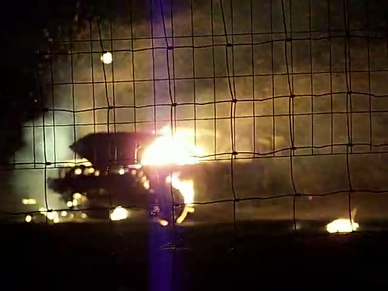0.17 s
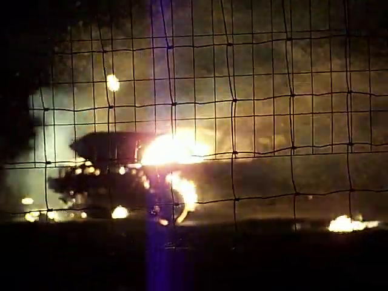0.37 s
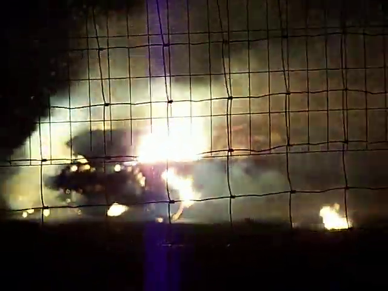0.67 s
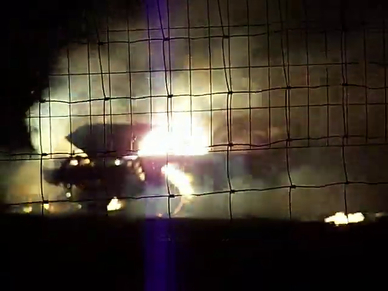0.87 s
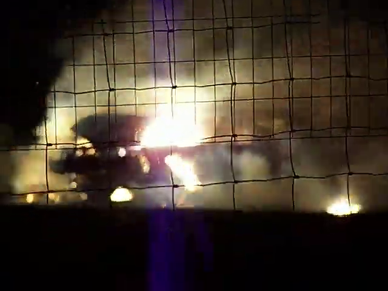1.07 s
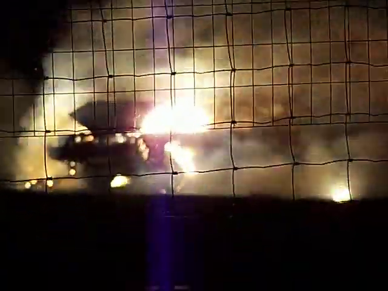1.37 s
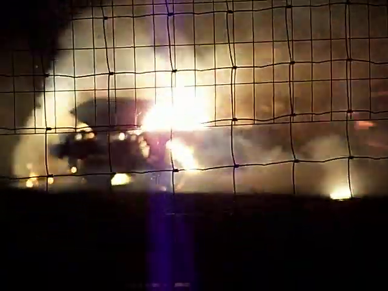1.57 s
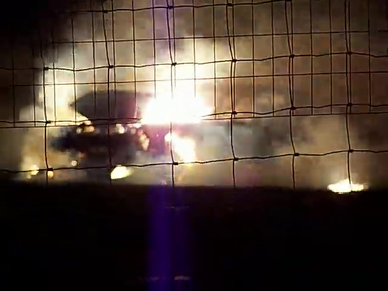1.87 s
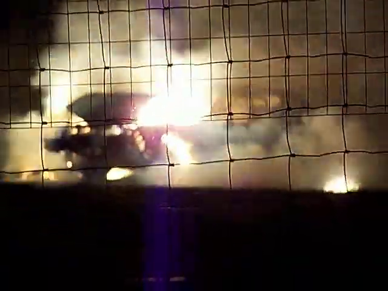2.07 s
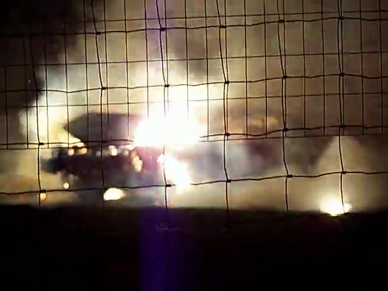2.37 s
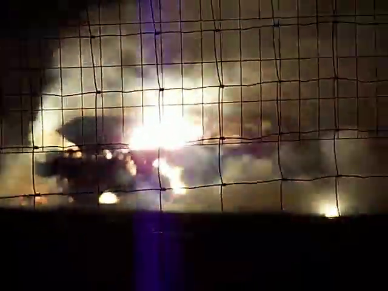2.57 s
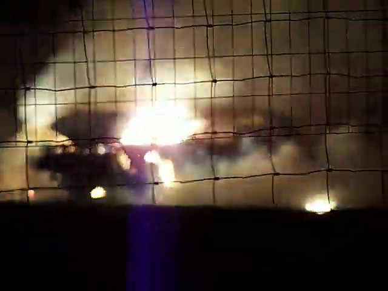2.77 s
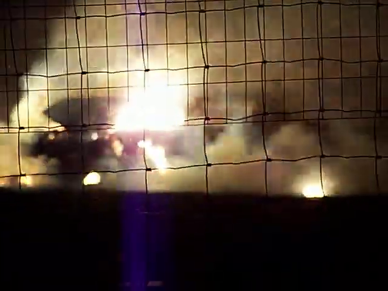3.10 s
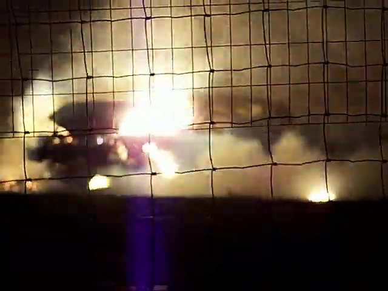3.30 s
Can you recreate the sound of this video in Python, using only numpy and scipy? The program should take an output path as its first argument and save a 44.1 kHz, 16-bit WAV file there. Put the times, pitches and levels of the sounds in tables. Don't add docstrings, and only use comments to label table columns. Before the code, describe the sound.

A jet engine runs continuously at high power on open ground at night, rumbling and roaring, while a very high whine grows stronger and flutters; heard some tens of metres away through a small camera microphone.

```python
import sys
import numpy as np
from scipy import signal
from scipy.fft import rfft, irfft
from scipy.io import wavfile
from scipy.ndimage import uniform_filter1d

SR = 44100
rng = np.random.default_rng(int(sys.argv[2]) if len(sys.argv) > 2 else 0)


def output_pcm(signal):
    pcm = np.clip(np.atleast_2d(signal).T, -1, 1) * 32767
    wavfile.write(sys.argv[1], SR, np.round(pcm).astype(np.int16))


def nominal_scale(level):
    x = np.asarray(level, float) / 20
    return 10 ** x


N = 151704
BLADES = 44


def rms_one(x):
    return x / np.sqrt(np.mean(x ** 2) + 1e-20)


def in_time(rows):
    s, *columns = np.transpose(rows)
    return [np.interp(np.arange(N) / SR, s, column) for column in columns]


def at_hz(points, hz):
    table_hz, db = np.transpose(points)
    return np.interp(np.log(hz + 1e-3), np.log(table_hz), db)


def drift(rate_hz):
    r = np.exp(-80 * np.pi * rate_hz / SR)
    noise = rng.standard_normal(N // 40 + 2002)
    slow = signal.lfilter([1], [1, -2 * r, r * r], noise)[2000:]
    return np.interp(np.arange(N) / 40, np.arange(len(slow)), rms_one(slow))


def turbulence(colour, patchy_db):
    hz = np.fft.rfftfreq(N, 1 / SR)
    low, high = colour[0][0], colour[-1][0]
    inside = np.clip(np.minimum(hz / low - .5, 2 - hz / high) * 2, 0, 1)
    spectrum = rfft(rng.standard_normal(N)) * nominal_scale(at_hz(colour, hz)) * inside
    place = 2 * np.log2(np.clip(hz, low, high) / low)
    together = drift(15.0)
    out = 0
    for k in range(int(place.max()) + 2):
        overlap = np.clip(1 - abs(place - k), 0, 1)
        band = irfft(spectrum * overlap, N)
        out = out + band * nominal_scale(patchy_db * (0.13 * together + drift(8.0)))
    return rms_one(out)


# (time [s], pitch [Hz])
BLADE_PITCH = [(0, 7279), (.85, 7286), (1.4, 7289), (2.5, 7291.5), (3.44, 7294.5)]


def shaft_angle():
    blade_hz, = in_time(BLADE_PITCH)
    return 2 * np.pi * np.cumsum(blade_hz) / SR / BLADES


# (time [s], level [dB])
HISS_LEVEL = [(0, -32.5), (.5, -32.5), (.9, -35), (1.3, -30.5), (2.0, -28), (2.5, -30.5), (3.0, -33.5),
              (3.44, -32)]
# (frequency [Hz], level per Hz [dB])
HISS_COLOUR = [(2500, -20.5), (3500, -22), (4200, 2.5), (5000, -1.5), (5800, 2.5), (6500, 8.5),
               (7500, -9.5), (8050, -6.5)]


def compressor_hiss():
    level_db, = in_time(HISS_LEVEL)
    return nominal_scale(level_db + 1.5) * turbulence(HISS_COLOUR, patchy_db=1.2)


ORDER_MULTIPLES = [18, 19, 21, 22, 25, 28]
ORDER_LEVELS = [-47, -48.5, -52, -54.5, -32.5, -44.5]
# (time [s], level [dB])
ORDER_SWELL = [(0, -1), (.8, 1.7), (1.1, 2.5), (2.0, 0.5), (2.6, -2.5), (3.44, -0.7)]


def shaft_orders(angle):
    orders = 0
    for multiple, level_db in zip(ORDER_MULTIPLES, ORDER_LEVELS):
        start = rng.uniform(0, 2 * np.pi)
        tone = np.sqrt(2) * np.sin(multiple * angle + start)
        orders = orders + tone * nominal_scale(level_db - 0.5 * drift(9.5))
    swell_db, = in_time(ORDER_SWELL)
    return orders * nominal_scale(swell_db)


# (frequency [Hz], level per Hz [dB])
ROAR_COLOUR = [(200, -6), (600, 1), (1170, -5), (1440, -1.5), (1650, -5.5), (2200, 0), (3000, -3),
               (4500, -17)]


def exhaust_roar():
    return nominal_scale(-23.5) * turbulence(ROAR_COLOUR, patchy_db=.5)


# (frequency [Hz], level per Hz [dB])
RUMBLE_COLOUR = [(15, -24), (27, -5.5), (48, 1), (70, 3), (115, -3), (190, -3), (300, -9), (600, -21)]
# (time [s], level [dB])
RUMBLE_SWELL = [(0, 1), (.3, -4), (.6, -1.5), (1.0, -3.5), (1.4, -2.5), (1.8, -2.5), (2.2, -2.5),
                (2.55, -3.5), (2.85, -2), (3.1, -3), (3.44, -4)]


def exhaust_rumble():
    evenness, even_s = .55, .05
    rumble = turbulence(RUMBLE_COLOUR, patchy_db=-0.94)
    power = uniform_filter1d(rumble ** 2, int(even_s * SR))
    power = uniform_filter1d(power, int(even_s * SR / 2))
    rumble = rms_one(rumble * (power + .05) ** (-evenness / 2))
    swell_db, = in_time(RUMBLE_SWELL)
    return nominal_scale(-19.5 + swell_db) * rumble


# (time [s], level [dB], hump against tone [dB])
WHINE_LEVEL = [(0, -24.5, 6), (.22, -22, 4), (.55, -20.5, 0.3), (.8, -23, 2.5), (1.07, -21, 0.5),
               (1.25, -16.5, -1.5), (1.6, -14, -2.5), (1.9, -16, -1.3), (2.12, -19, 1.5), (2.2, -22, 4),
               (2.4, -17.5, -2.1), (2.65, -20, 0.5), (2.8, -16.5, -1.5), (3.0, -16.5, -2.5),
               (3.15, -15.5, -2), (3.3, -17, 2), (3.44, -17.5, 2.2)]
# (frequency [Hz], level per Hz [dB])
HUMP_COLOUR = [(5500, -28), (6300, -16.5), (6800, -5.5), (7080, -0.5), (7230, 3.5), (7400, -1),
               (7700, -5.5), (8050, -11)]


def blade_whine(angle):
    level_db, hump_db = in_time(WHINE_LEVEL)
    tone = np.sqrt(2) * np.sin(BLADES * angle) * nominal_scale(-4 + 0.5 * drift(21))
    hump = nominal_scale(1 + hump_db) * turbulence(HUMP_COLOUR, patchy_db=0.25)
    gust_db = .7 * drift(22)
    return nominal_scale(level_db + gust_db) * (tone + hump)


# (delay [s], gain [ratio], dulled above [Hz], phase turn of the soft surface [rad])
ECHOES = [
    (.0021, 0.22, 1385, -0.1),
    (.0033, 0.16, 595, 0.07),
    (.0052, 0.11, 218, 1.1),
    (.0095, 0.068, 1207, 3),
    (0.012, 0.4, 296, 1.16),
    (0.018, 0.061, 1200, -0.8),
    (0.026, 0.061, 300, 0.96),
    (0.035, 0.14, 330, 1.5),
    (0.046, 0.38, 289, 1.23),
]


def yard(x):
    hz = np.fft.rfftfreq(N, 1 / SR)
    paths = 1
    for delay_s, gain, dull_hz, turn in ECHOES:
        late = np.exp(1j * (turn - 2 * np.pi * hz * delay_s))
        paths = paths + gain * late / np.sqrt(1 + (hz / dull_hz) ** 4)
    return irfft(rfft(x) * paths, N)


def scene():
    angle = shaft_angle()
    compressor = compressor_hiss() + shaft_orders(angle) + blade_whine(angle)
    exhaust = exhaust_roar() + exhaust_rumble()
    return yard(compressor + exhaust)[None]


def roll_off(x):
    return signal.sosfilt(signal.butter(12, 9150, fs=SR, output="sos"), x)


# (frequency [Hz], level [dB])
PORT_DIP = [(3600, 0), (3800, -6), (4050, -15), (4185, -29), (4300, -18), (4450, -10), (4650, -5),
            (5100, 0)]


def record(dry):
    overload, camera_rate_hz = 0.56, 16000
    hz = np.fft.rfftfreq(N, 1 / SR)
    rounded = overload * np.tanh(dry[0] / overload)
    spectrum = rfft(rounded) * nominal_scale(at_hz(PORT_DIP, hz))
    half = int(round(camera_rate_hz / 2 * N / SR))
    above = np.arange(half, 2 * half)
    khz = (hz[above] - hz[half]) / 1000
    spectrum[half:] = 0
    image_db = -31 * khz - 10 * khz ** 8
    spectrum[above] = np.conj(spectrum[2 * half - above]) * nominal_scale(image_db)
    mix = irfft(spectrum, N)[None]
    return roll_off(mix)


dry = scene()
out = record(dry)
output_pcm(out)
```